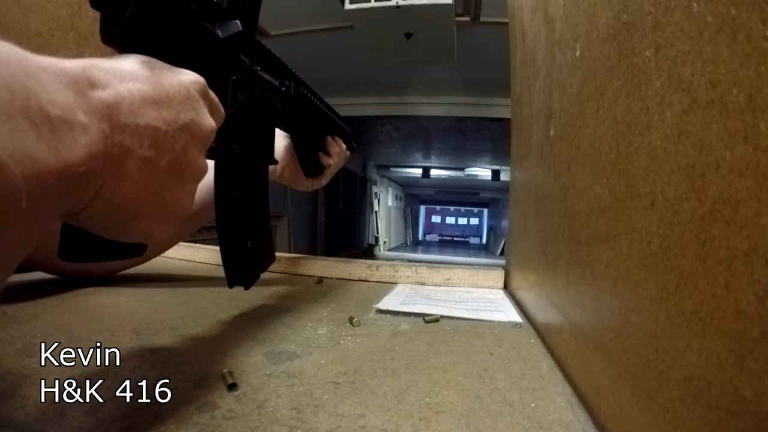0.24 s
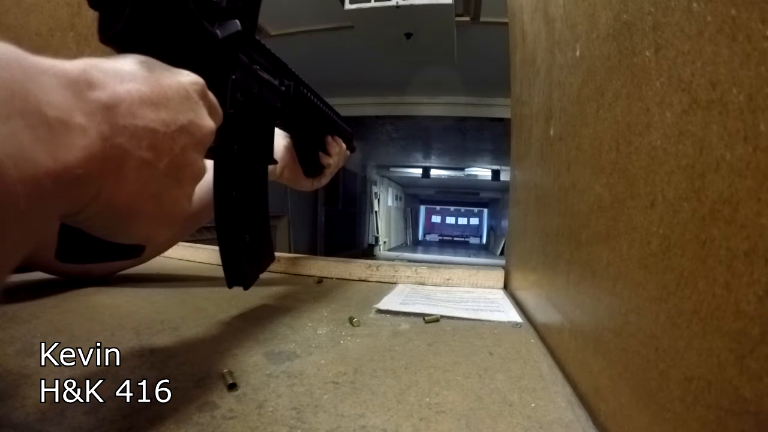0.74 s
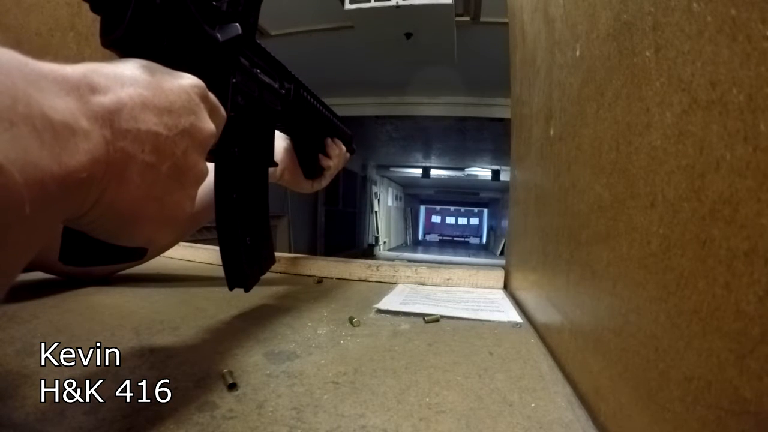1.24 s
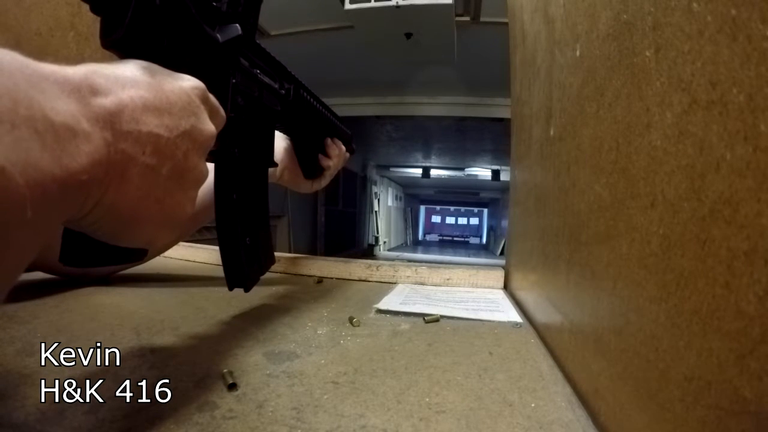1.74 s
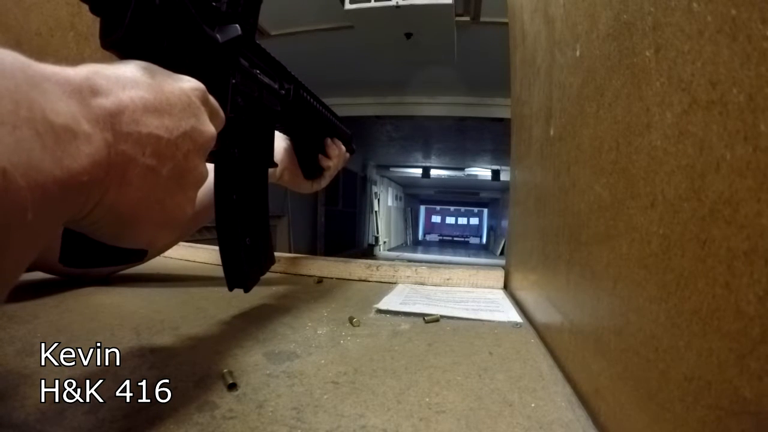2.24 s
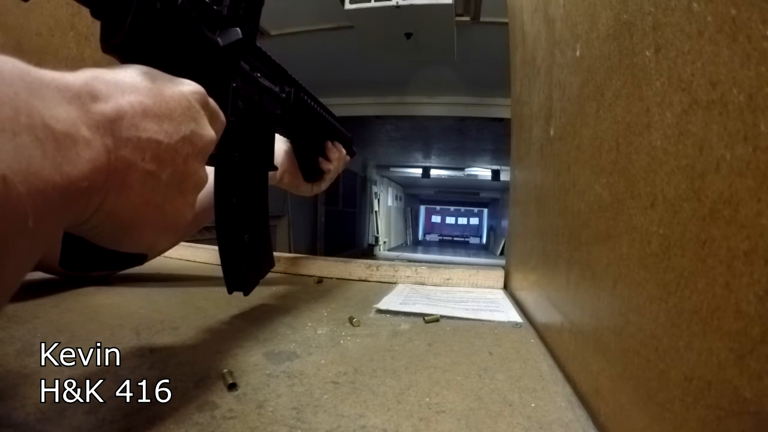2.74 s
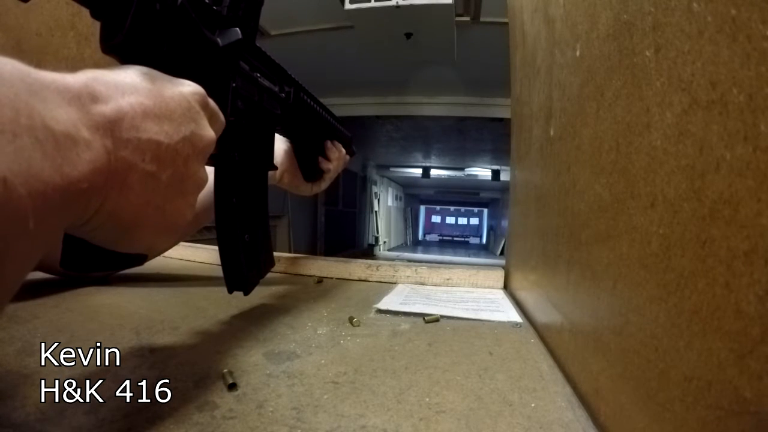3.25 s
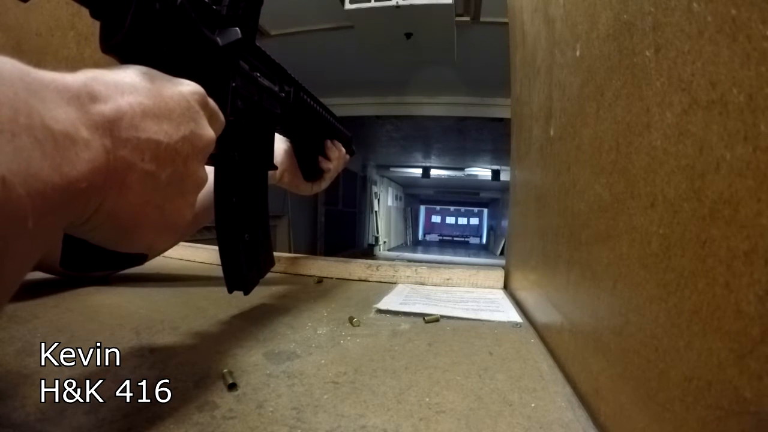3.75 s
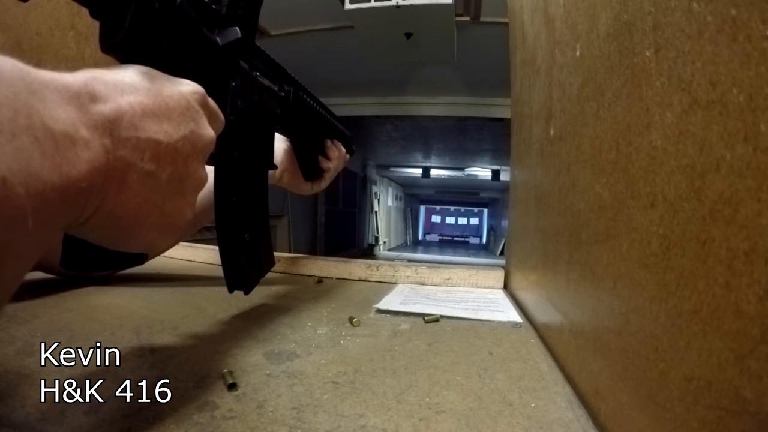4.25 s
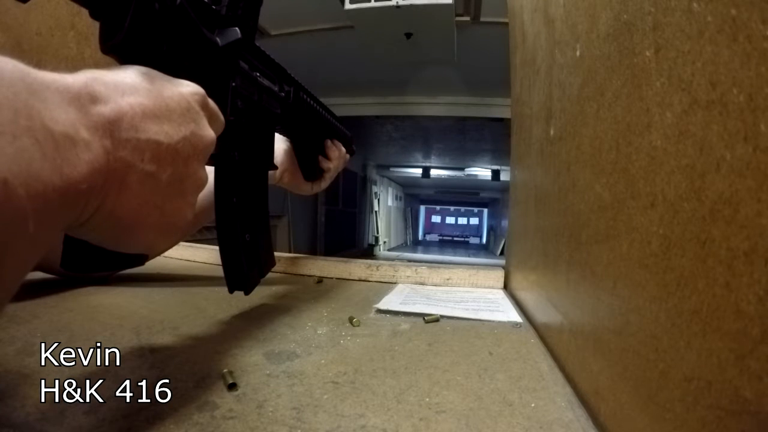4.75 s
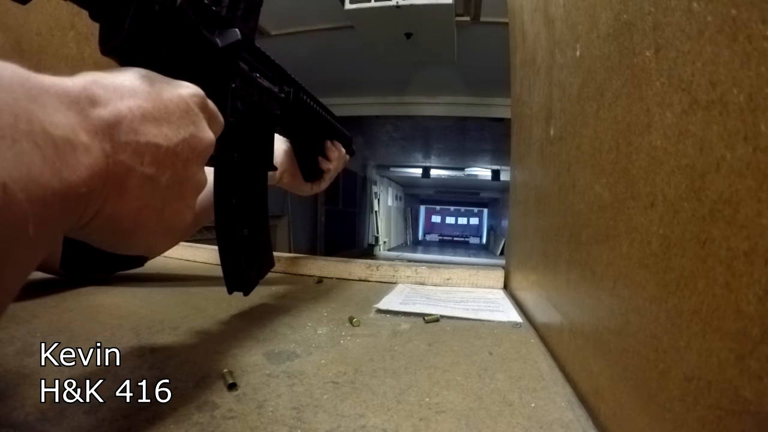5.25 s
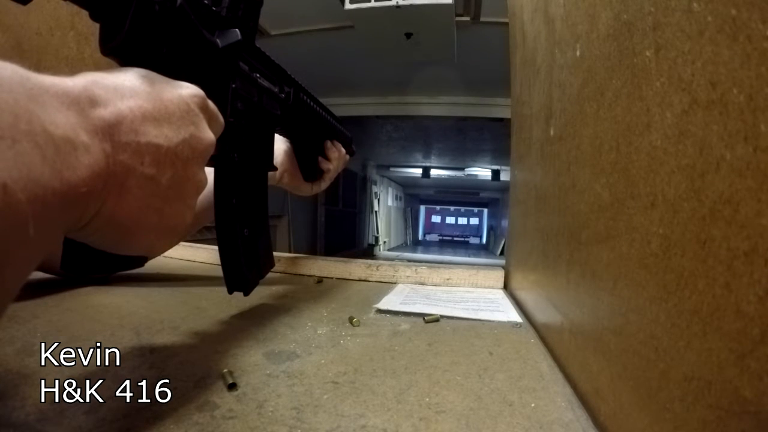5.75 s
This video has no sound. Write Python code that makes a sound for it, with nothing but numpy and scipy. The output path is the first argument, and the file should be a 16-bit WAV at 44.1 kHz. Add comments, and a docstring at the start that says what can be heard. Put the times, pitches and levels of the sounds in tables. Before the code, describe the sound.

A rifle fires three loud single shots close to the microphone in a wooden booth at an indoor shooting range. Before each one comes a less sharp shot from another lane. Every blast slaps off the walls, booms and rolls away down a concrete tunnel, and the close ones slightly overload the microphone. Faint metal clinks, soft rubs and a dull thump fall in the gaps, over quiet ventilation.

```python
"""A rifle shot from another lane is already rolling down the concrete tunnel of an indoor range.
Four shots come from other lanes, three from the wooden booth that holds a small cased camera.
Each blast slaps off the nearest walls, booms in the firing area and reverberates in the tunnel.
The close shots overload the microphone and duck its gain. Between shots come faint metal clinks,
rubs, taps and one dull thump, over the rumble and hiss of ventilation."""
import sys
import numpy as np
from scipy import signal
from scipy.fft import rfft, irfft
from scipy.io import wavfile
from scipy.ndimage import uniform_filter1d

SR = 44100
rng = np.random.default_rng(int(sys.argv[2]) if len(sys.argv) > 2 else 0)


def wav_out(sig):
    """Save sig, one row per channel (or a flat mono array), as 16-bit PCM at SR to the path in sys.argv[1]."""
    wavfile.write(sys.argv[1], SR, np.round(np.clip(np.atleast_2d(sig).T, -1, 1) * 32767).astype(np.int16))


N = 264314
SIZE = 2 * SR  # samples in one event
T = np.arange(SIZE) / SR
HZ = np.fft.rfftfreq(SIZE, 1 / SR)


def amp(db):
    """Amplitude ratio: a factor of ten per 20 dB."""
    return 10 ** (np.asarray(db) / 20)

def unit(x):
    """Normalisation to rms 1."""
    return x / np.sqrt(np.mean(x ** 2))

def curve(points, hz):
    """Interpolation of (frequency, value) points on a logarithmic frequency axis."""
    f, value = np.transpose(points)
    return np.interp(np.log(hz + 1), np.log(f), value)

def add(mix, s, sound):
    """Superposition: a sound joins the mix at time s, which may lie before the start."""
    at = round(s * SR)
    sound = sound[max(-at, 0):]
    part = mix[max(at, 0):][:len(sound)]
    part += sound[:len(part)]

def resonances(bands):
    """Resonance: each (frequency, width, gain) band is a bell-shaped peak or notch, in dB."""
    return sum(db * np.exp(-2 * ((HZ - hz) / width) ** 2) for hz, width, db in bands)

def diffuse(spectrum, colour_db):
    """Diffuse field: dense random reflections sum to coloured noise, here of rms 1."""
    gain = amp(curve(spectrum, HZ) + colour_db)
    return unit(irfft(rfft(rng.standard_normal(SIZE)) * gain, SIZE))

def absorb(x, t60s):
    """Absorption: air and walls give each frequency its own reverberation time."""
    hz, t, bins = signal.stft(x, SR, nperseg=512)
    fade = np.exp(-np.log(1000) * t / curve(t60s, hz)[:, None])
    return signal.istft(bins * fade, SR, nperseg=512)[1][:SIZE]

def build_up(rise_s):
    """Energy approaches its full value exponentially; amplitude is its square root."""
    return np.sqrt(1 - np.exp(-T / rise_s))

def burst(decay_s, rise_s=0.00086):
    """Transient envelope: exponential attack and decay."""
    return (1 - np.exp(-T / rise_s)) * np.exp(-T / decay_s)

def bunching(depth_db, length_s):
    """Amplitude modulation: arrivals come in random bunches a few milliseconds long."""
    return amp(depth_db * unit(uniform_filter1d(rng.standard_normal(SIZE), int(length_s * SR))))

def echoes(sound, paths):
    """Multipath propagation: one copy of a sound or envelope per (delay [s], level [dB]) path."""
    out = np.zeros(SIZE)
    for delay, db in paths:
        add(out, delay, amp(db) * sound)
    return out

def ringing(modes):
    """Free vibration: a struck object's modes are damped sinusoids."""
    return sum(np.sin(2 * np.pi * hz * T) * amp(db) * np.exp(-np.log(1000) * T / t60)
               for hz, db, t60 in modes)

def waver(top_hz, count=12):
    """Beating: slow sinusoids of random phase sum to a swell of rms 1."""
    t = np.arange(0, N / SR + .1, .02)
    rates = top_hz * np.arange(1, count + 1) / count
    swell = sum(np.sin(2 * np.pi * (hz * t + rng.random())) for hz in rates)
    return np.interp(np.arange(N) / SR, t, unit(swell))


# spectra of the airflow and of the air handling's rumble: (frequency [Hz], relative level [dB])
AIRFLOW_SPECTRUM = [(20, -14), (45, -11), (100, -8.5), (160, -9), (400, -2.5), (900, -25), (2500, -25),
                    (5000, -23), (9000, -35), (11500, -37.5), (15000, -44)]
RUMBLE_SPECTRUM = [(15, -8.5), (30, 2.5), (45, -6.5), (70, -4), (130, -24), (600, -70)]
def ventilation():
    """Broadband noise: air drawn down the range gives a steady hiss and a wavering rumble."""
    hz = np.fft.rfftfreq(N, 1 / SR)
    hiss, rumble = (unit(irfft(rfft(rng.standard_normal(N)) * amp(curve(spectrum, hz)), N))
                    for spectrum in (AIRFLOW_SPECTRUM, RUMBLE_SPECTRUM))
    return amp(-56.5) * hiss + amp(-61.5 + 3 * waver(top_hz=.8)) * rumble


# resonances and notches of the camera case: (frequency [Hz], width [Hz], gain [dB])
CASE_BANDS = [(503, 202, 5.5), (1373, 114, 6.5), (1820, 280, 4.5), (2507, 120, 4), (2870, 94, 3),
              (3070, 330, -3.5), (3350, 170, 2.5), (3727, 220, 6), (3880, 71, 1), (4620, 150, -3.5),
              (4870, 140, 2), (5640, 180, 4.5), (6230, 280, -3.5), (6840, 490, 4), (7600, 450, 1.5),
              (8500, 440, -4), (10340, 520, 3.5)]
def cased_noise(spectrum, colour_db=0):
    """Enclosure resonance: the camera case colours the noise that passes through it."""
    return diffuse(spectrum, resonances(CASE_BANDS) + colour_db)


# spectrum of the boom, and also of the rubs: (frequency [Hz], relative level [dB])
DULL_SPECTRUM = [(20, -17), (45, -1.5), (110, -4.5), (220, -2.5), (330, -10.5), (600, -15.5), (1500, -37),
                 (6000, -77.5)]
# low resonances of the firing area: (frequency [Hz], width [Hz], gain [dB])
ROOM_MODES = [(71.5, 20, 9.5), (106, 20, 1), (137, 24, 13.5), (170, 16, -0.5), (218, 42, 9), (416, 21, 6)]
# decay of the boom: (frequency [Hz], t60 [s])
BOOM_DECAY = [(40, 0.14), (110, 0.35), (220, 0.5), (600, 0.97)]
def boom(rise_s, tilt_db_per_octave):
    """Room modes: the firing area stores the blast's bass and lets it die away."""
    tilt_db = tilt_db_per_octave * np.log2(np.clip(HZ, 30, 160) / 160)
    field = diffuse(DULL_SPECTRUM, resonances(ROOM_MODES) + tilt_db)
    return absorb(field, BOOM_DECAY) * build_up(rise_s)


# reflections in the firing area: (frequency [Hz], relative level [dB]) and (frequency [Hz], t60 [s])
AREA_SPECTRUM = [(60, -11), (250, -6.5), (700, -10), (1100, -7.5), (1700, -1.5), (3500, 1), (4600, -7.5),
                 (7000, -11.5), (9000, -15.5), (15000, -28)]
AREA_DECAY = [(100, 0.36), (1000, 0.58), (3000, 0.55), (8000, 0.3), (15000, 0.32)]
def area_clatter(rise_s, colour_db):
    """Early reverberation: bunched reflections fill the firing area and soon fade."""
    field = absorb(cased_noise(AREA_SPECTRUM, colour_db), AREA_DECAY)
    return field * build_up(rise_s) * bunching(depth_db=1, length_s=.005)


# reflections in the tunnel: (frequency [Hz], relative level [dB]) and (frequency [Hz], t60 [s])
TUNNEL_SPECTRUM = [(30, -47), (70, -11), (150, -40.5), (230, -5), (320, -12), (520, -7.5), (800, -6.5),
                   (1100, -5), (1700, 0), (3400, 3.5), (4500, -5.5), (6800, -9), (8300, -12),
                   (15000, -25.5)]
TUNNEL_DECAY = [(60, 0.98), (250, 1.6), (550, 2.065), (1400, 1.806), (2500, 1.914), (3700, 1.578),
                (6800, 1.208), (10000, 0.82), (15000, 0.64)]
def tunnel_roll(rise_s, colour_db):
    """Late reverberation: the tunnel fills slowly, and its far end returns a soft swell at 0.6 s."""
    field = absorb(cased_noise(TUNNEL_SPECTRUM, colour_db), TUNNEL_DECAY)
    far_end_swell = amp(0.68 * np.exp(-((T - .6) / .07) ** 2))
    return field * build_up(rise_s) * bunching(depth_db=-0.1, length_s=0.0079) * far_end_swell


# small metal parts being handled: (time [s], level [dB])
CLINK_EVENTS = [(2.019, -62), (3.084, -44.5), (3.454, -46.5), (4.381, -56), (4.579, -49), (5.97, -53)]
# the ping that starts each clink: (frequency [Hz], relative level [dB], t60 [s])
PING_MODES = [(8250, -7, 0.032)]
# the rattle within it: (frequency [Hz], relative level [dB])
METAL_SPECTRUM = [(500, -25), (3000, 11), (6500, -2.5), (8500, -4), (10000, -11), (15000, -14)]
def clinks():
    """Impact on metal: one high mode pings over a short, noisy rattle."""
    out = np.zeros(N)
    for s, db in CLINK_EVENTS:
        rattle = unit(cased_noise(METAL_SPECTRUM) * bunching(depth_db=1, length_s=.003))
        add(out, s, amp(db) * (ringing(PING_MODES) + rattle * burst(decay_s=0.044, rise_s=0.0022)))
    return out


# soft rubs against the bench: (time [s], level [dB])
RUB_EVENTS = [(3.43, -47), (4.531, -49), (4.58, -42.5), (4.645, -46)]
def rubs():
    """Friction: sliding contact makes a brief swell of dull noise."""
    out = np.zeros(N)
    for s, db in RUB_EVENTS:
        add(out, s, amp(db) * cased_noise(DULL_SPECTRUM) * burst(decay_s=0.054, rise_s=0.017))
    return out


# light taps on wood: (time [s], level [dB], frequency [Hz])
TAP_EVENTS = [(4.655, -45, 905), (5.965, -46, 630)]
def taps():
    """Heavy damping: tapped wood sounds one mode for a few cycles."""
    out = np.zeros(N)
    for s, db, hz in TAP_EVENTS:
        add(out, s, amp(db) * np.sin(2 * np.pi * hz * T) * burst(decay_s=0.0082, rise_s=0.0011))
    return out


# modes of a booth panel: (frequency [Hz], relative level [dB], t60 [s])
PANEL_MODES = [(111, 0.5, 0.67), (129, -27, .3), (218, -14.5, 0.52)]
def booth_panel(db, rise_s):
    """Plate vibration: a knock or a blast sets the panel's low modes ringing."""
    return amp(db) * ringing(PANEL_MODES) * build_up(rise_s)

def thump():
    """Impact excitation: one soft knock against the booth."""
    out = np.zeros(N)
    add(out, 4.767, booth_panel(db=-24.5, rise_s=0.0046))
    return out


def pressure_push(length_s, top_hz):
    """Friedlander wave: muzzle gas gives a short overpressure, then a longer suction; peak 1."""
    band = signal.butter(2, [30, top_hz], "band", fs=SR, output="sos")
    t = T[:SR // 4]
    wave = signal.sosfilt(band, (1 - t / length_s) * np.exp(-t / length_s))
    return wave / abs(wave).max()


BODY_BAND, BITE_BAND = (730, 1400), (2200, 1200)  # where guns differ: (frequency [Hz], width [Hz])
# shots in other lanes: (time [s], direct [dB], slap [dB], firing area [dB], boom [dB],
# boom tilt [dB/octave], tunnel [dB], tunnel build-up [s], body [dB], bite [dB])
OTHER_LANE_SHOTS = [(-.11, -12, -6, -8.5, -25.5, -1, -12.5, 0.12, -1.5, 2.5),
                    (.114, -12, -5, -13, -31.5, 6, -14.5, 0.1, -1, 0.5),
                    (1.2382, -6.5, -7, -11.5, -25, 6.5, -13.5, 0.071, 3, -2),
                    (3.543, -19.5, 4, -5.5, -13.5, -0.5, -14, .049, -1, 2)]
def far_rifles(crossing_s=0.01055, crossing_loss_db=5, spill_s=0.0085):
    """Screening and flutter echo: blasts spill round the partitions and slap between the side walls."""
    # the first slap is still screened, the second is the strongest, later ones fade
    paths = [(crossing_s, -10)] + [((k + 2) * crossing_s, -k * crossing_loss_db) for k in range(4)]
    slaps = echoes(burst(decay_s=0.0039), paths)
    push = echoes(pressure_push(length_s=0.00035, top_hz=190), [(k * crossing_s, 0) for k in (1, 2, 3)])
    panel = booth_panel(db=-36, rise_s=0.024)
    spill = 1 - np.exp(-T / spill_s)
    out = np.zeros(N)
    for shot in OTHER_LANE_SHOTS:
        s, direct_db, slap_db, area_db, boom_db, tilt, tunnel_db, tunnel_rise_s, body_db, bite_db = shot
        colour_db = resonances([(*BODY_BAND, body_db), (*BITE_BAND, bite_db)])
        room = (amp(area_db) * area_clatter(0.028, colour_db)
                + amp(boom_db) * boom(0.01, tilt)
                + amp(tunnel_db) * tunnel_roll(tunnel_rise_s, colour_db))
        arrivals = amp(direct_db) * burst(decay_s=0.0096) + amp(slap_db) * slaps
        crack = cased_noise(AREA_SPECTRUM, resonances([(*BITE_BAND, 3)])) * arrivals
        add(out, s, crack + amp(boom_db) * push + spill * room + panel)
    return out


def booth_paths(loss_db, rear_db, count, round_trip_s=.0078, rear_wall_s=.0525):
    """Reflection paths: direct, to and fro in the booth, and once back from the rear wall."""
    return [(k * round_trip_s, -k * loss_db) for k in range(count)] + [(rear_wall_s, rear_db)]


# spectrum of a close muzzle blast: (frequency [Hz], relative level [dB])
CRACK_SPECTRUM = [(40, -15.5), (250, 0), (600, -7.5), (850, 5), (1100, -10), (1900, 3.5), (2900, 1),
                  (3600, 6), (4200, 2), (5200, -9), (6800, -2.5), (9000, -9), (15000, -14.5)]
# shots in this booth: (time [s], crack [dB], rear-wall slap [dB re crack], push [dB], push length [s],
# firing area [dB], boom [dB], tunnel [dB])
BOOTH_SHOTS = [(0.6933, 9, -24, -10.5, 0.0068, -7, -17.5, -14.5),
               (2.3805, 12.5, -24, -4.5, 0.00059, -3.5, -10.5, -15.5),
               (4.8423, 14, -18, 3.5, 0.0045, 0, -8, -12.5)]
def near_rifle():
    """Time invariance: the rifle stays put, so its shots share a room response; each crack is new."""
    colour_db = resonances([(*BITE_BAND, -.7)])
    room = np.array([area_clatter(0.017, colour_db),
                     boom(.014, tilt_db_per_octave=-4),
                     tunnel_roll(0.14, colour_db)])
    panel = booth_panel(db=-29, rise_s=.02)
    blast = burst(decay_s=0.0032, rise_s=0.00066)
    out = np.zeros(N)
    for s, crack_db, rear_db, push_db, push_s, *room_db in BOOTH_SHOTS:
        arrivals = echoes(blast, booth_paths(loss_db=7.5, rear_db=rear_db, count=5))
        crack = cased_noise(CRACK_SPECTRUM) * arrivals
        push = echoes(pressure_push(push_s, top_hz=263.3), booth_paths(loss_db=8, rear_db=-8, count=2))
        add(out, s, amp(crack_db) * crack + amp(push_db) * push + amp(room_db) @ room + panel)
    return out


def scene():
    """Superposition: the pressures of all sources add at one microphone."""
    return (near_rifle() + far_rifles() + clinks() + rubs() + taps() + thump() + ventilation())[None]

def gain_control(x, threshold_db=-11, share=0.5, recovery_db_per_s=13):
    """Compression: the gain drops just ahead of a loud blast and creeps back, holding up the tail."""
    power_db = 10 * np.log10(abs(uniform_filter1d(x ** 2, size=700)) + 1e-9)
    excess_db = share * np.maximum(power_db - threshold_db, 0)
    recovered_db = recovery_db_per_s * np.arange(N) / SR
    cut_db = np.maximum.accumulate(excess_db + recovered_db, axis=-1) - recovered_db
    return x * amp(-uniform_filter1d(cut_db, size=200))

def record(dry, ceiling=0.89, band_limit_hz=15600):
    """Saturation: after gain control the sharpest peaks clip softly, then a low-pass limits the band."""
    ducked = gain_control(dry)
    clipped = ducked / (1 + (ducked / ceiling) ** 6) ** (1 / 6)
    low_pass = signal.firwin(511, band_limit_hz, window=("kaiser", 8), fs=SR)
    return signal.oaconvolve(clipped, low_pass[None], "same")


dry = scene()
out = record(dry)
wav_out(out)
```